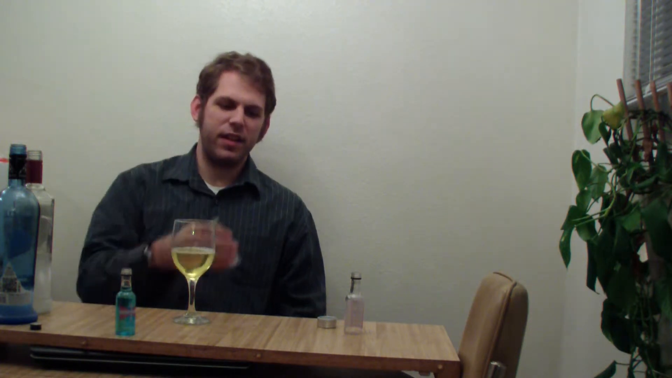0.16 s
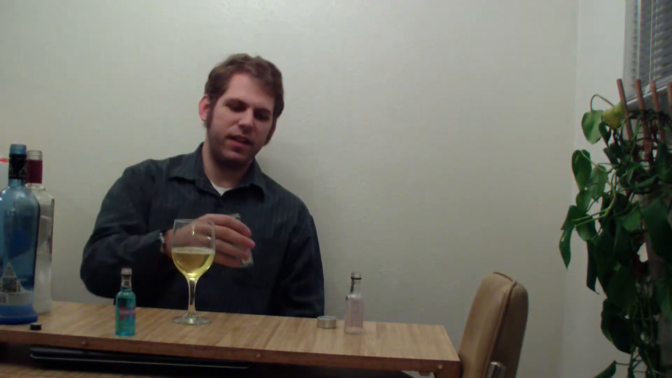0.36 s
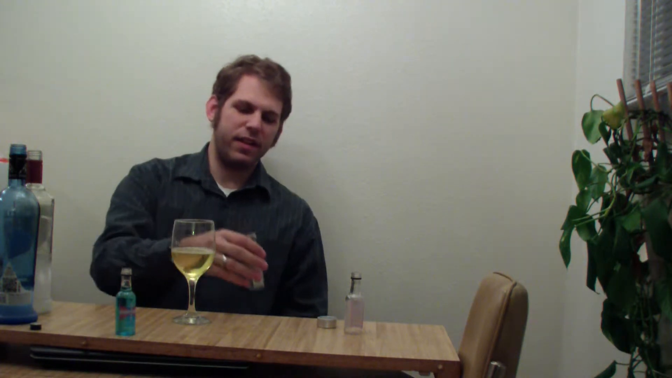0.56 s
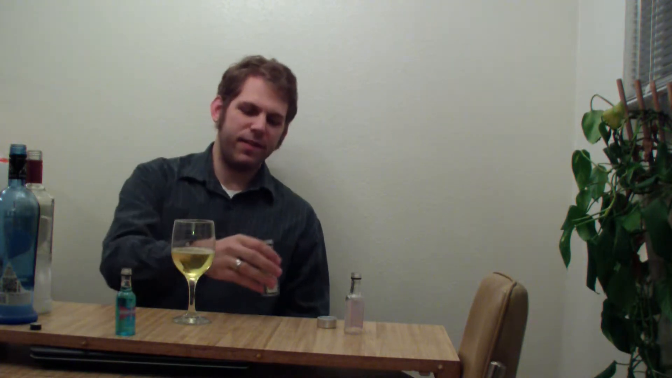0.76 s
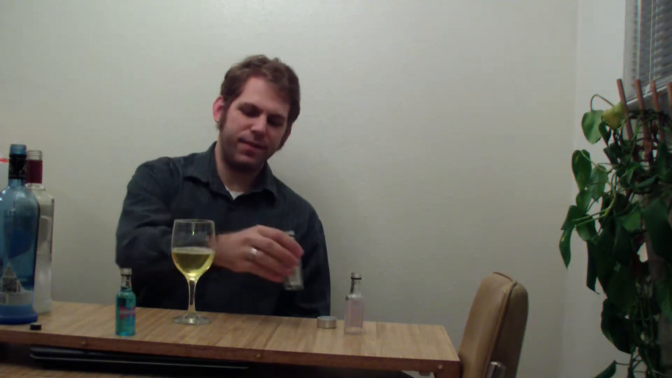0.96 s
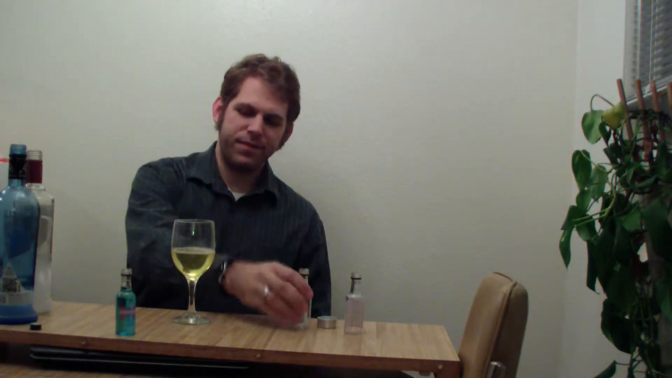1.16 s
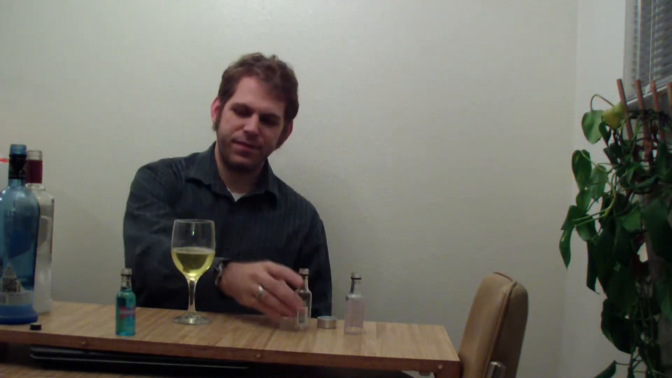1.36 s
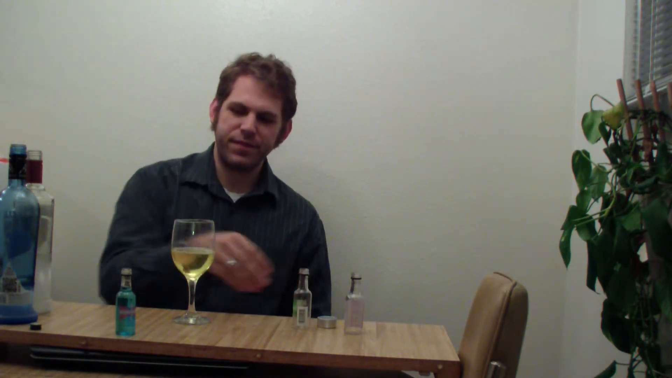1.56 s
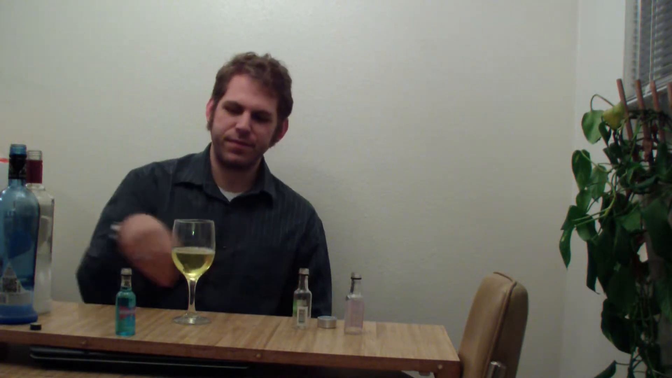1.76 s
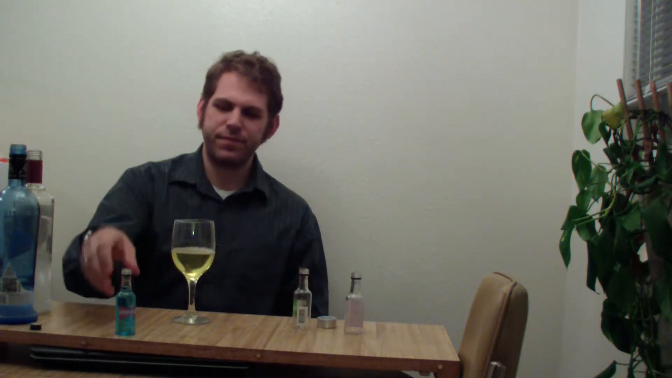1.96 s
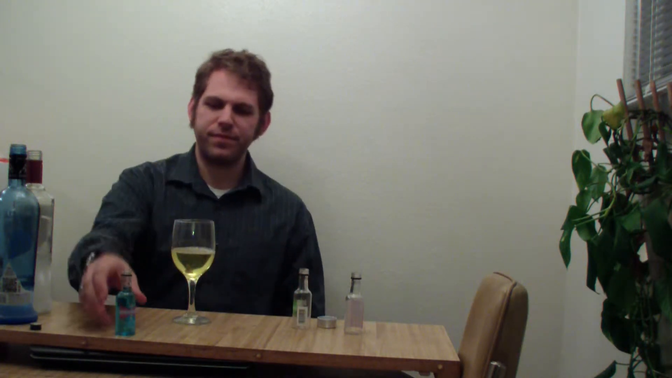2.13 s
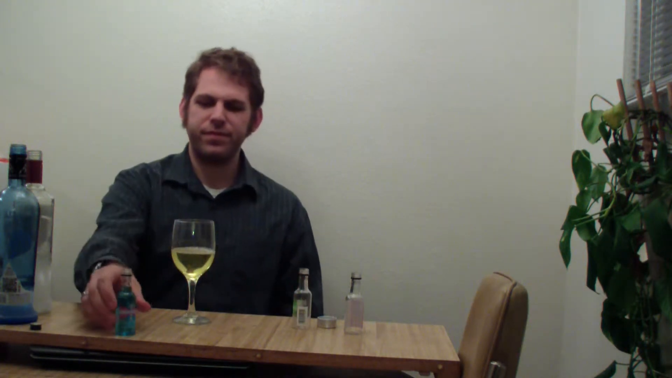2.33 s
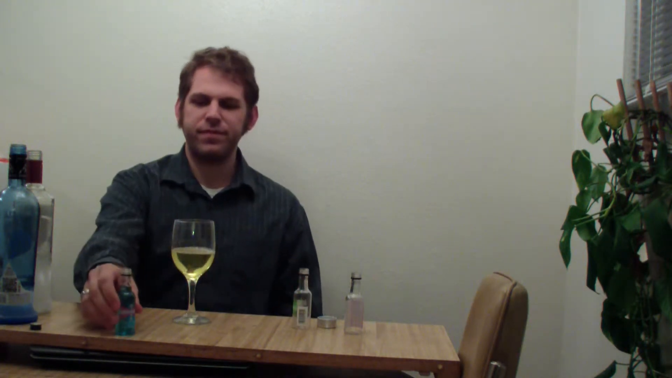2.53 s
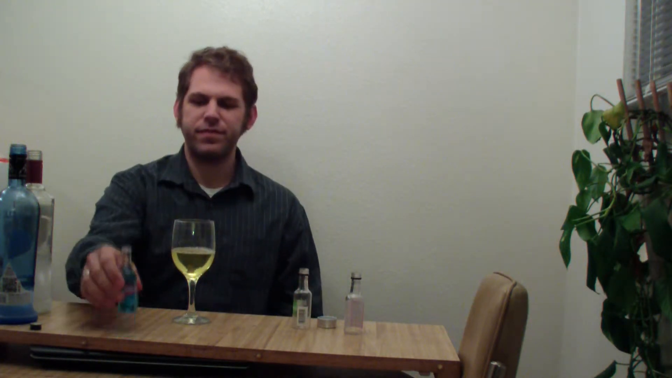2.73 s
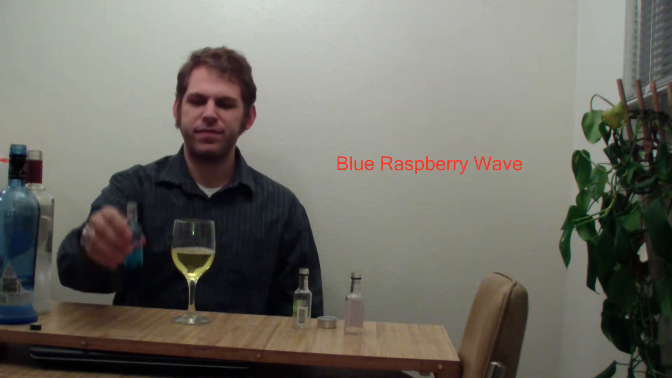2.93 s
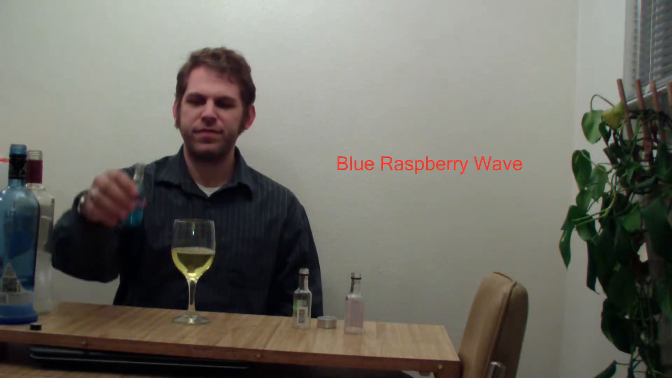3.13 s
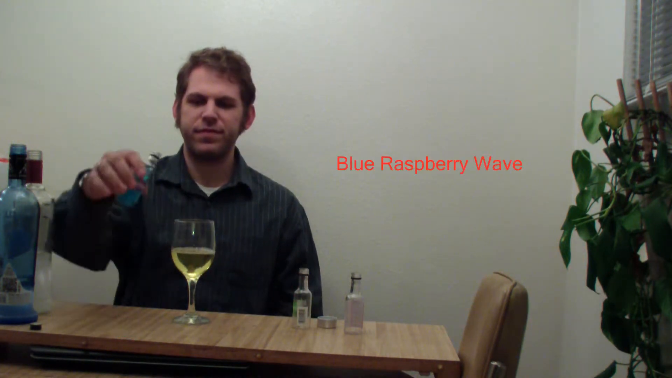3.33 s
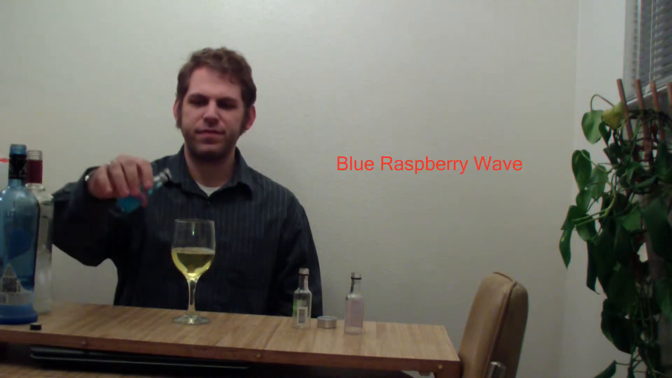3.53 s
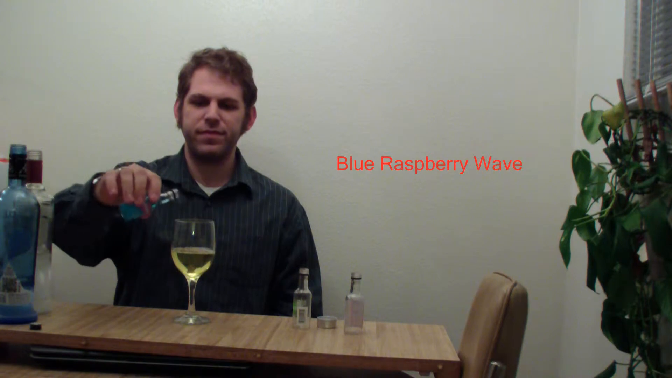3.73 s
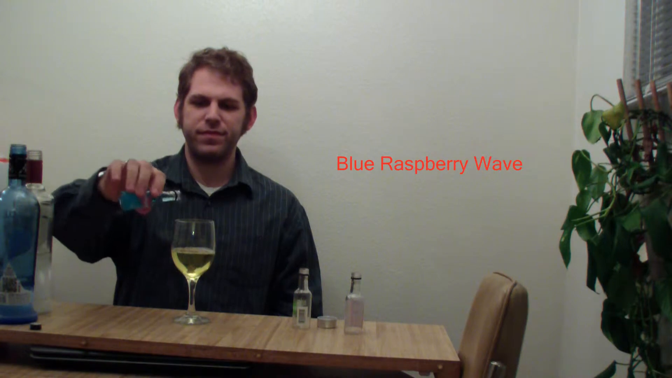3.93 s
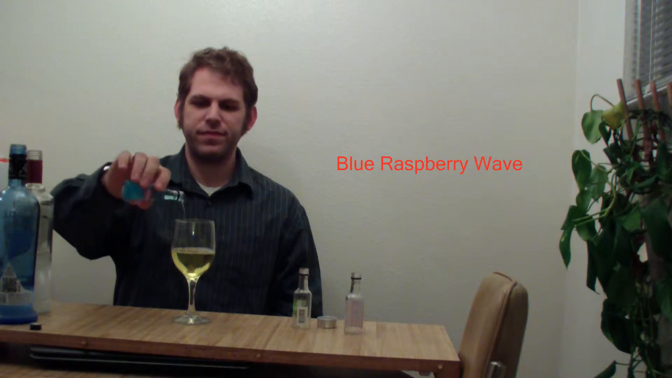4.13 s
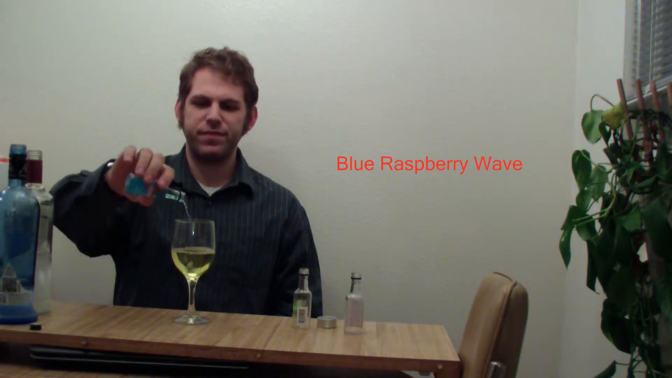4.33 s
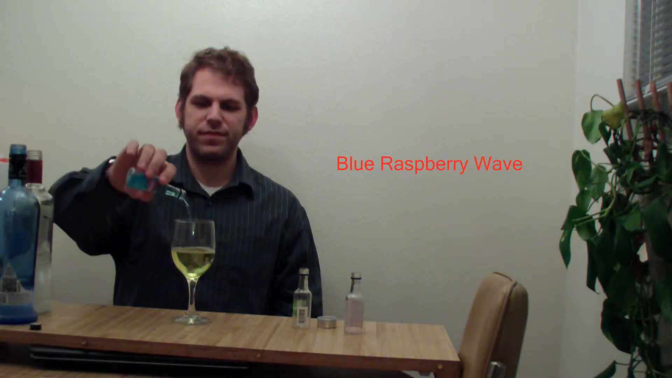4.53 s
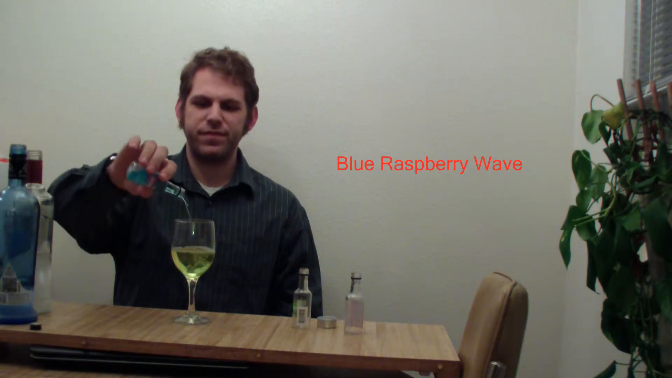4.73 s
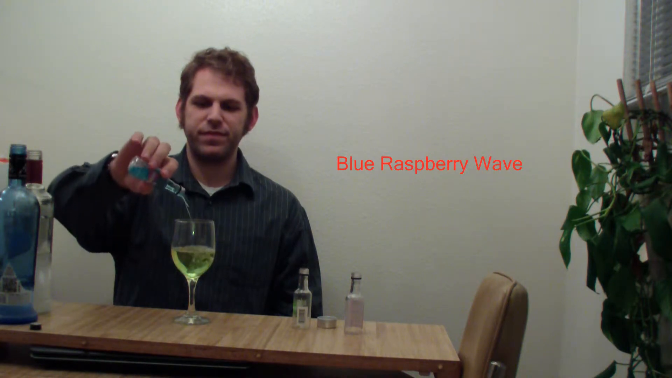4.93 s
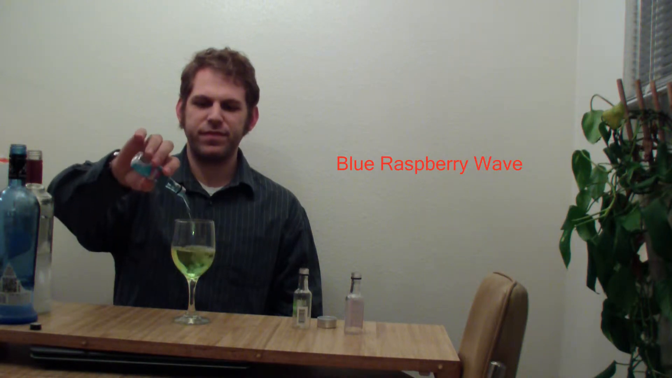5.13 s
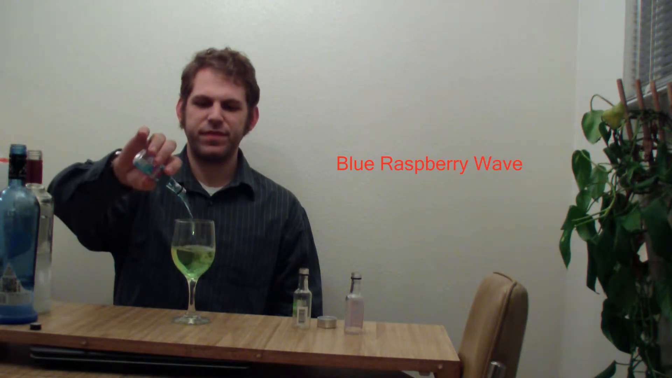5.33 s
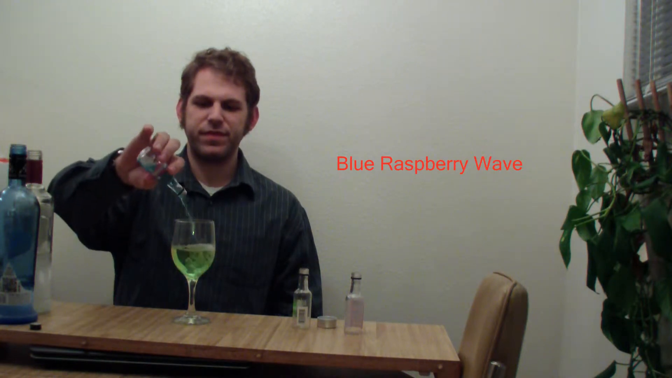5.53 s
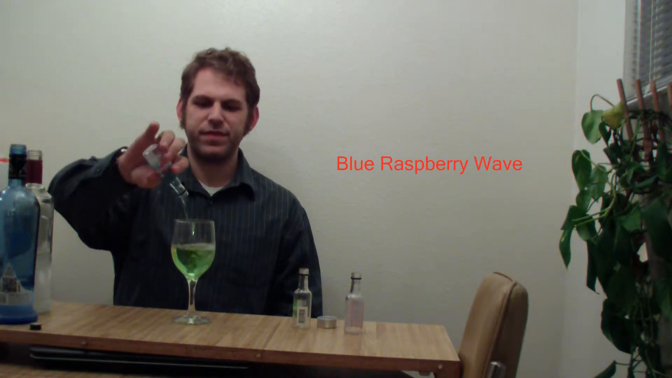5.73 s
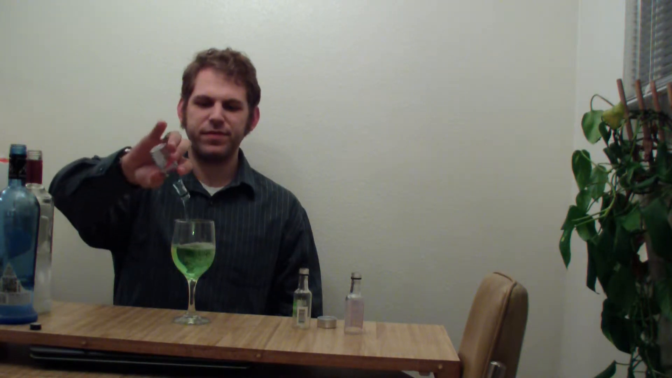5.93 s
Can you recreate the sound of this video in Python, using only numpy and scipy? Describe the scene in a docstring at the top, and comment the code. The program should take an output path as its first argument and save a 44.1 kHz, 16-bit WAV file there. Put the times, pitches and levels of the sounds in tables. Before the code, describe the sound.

In a small, quiet room, a few soft handling bumps lead to a miniature glass bottle being set down on a wooden table with a sharp knock. After a pause and another faint bump, a second bottle is poured into a half-full wine glass: a few drops first, then uneven little glugs over a thin, fizzy trickle. The microphone, a short way off, picks up slight room echo and faint hiss.

```python
"""Miniature bottles and a wine glass

In a small bare room a miniature glass bottle is set down hard, exciting the modes of a wooden table
and of its own glass. A second one is picked up and tipped over a half-full wine glass: first drops,
then uneven glugs as air gulps back through its neck, while the thin stream trickles and fizzes.
The pour sounds through trapped bubbles, each a damped oscillator. Air and mains hum lie beneath."""
import sys
import numpy as np
from scipy import signal
from scipy.fft import rfft, irfft
from scipy.io import wavfile

SR = 44100
rng = np.random.default_rng(int(sys.argv[2]) if len(sys.argv) > 2 else 0)


def materialize(psi):
    """Save the field psi as 16-bit PCM at rate SR to the path in sys.argv[1].

    A 1-D psi becomes a single channel; in a 2-D psi each row is a channel.
    """
    bounded = np.clip(np.atleast_2d(psi).T, -1, 1)
    quanta = np.round(bounded * 32767).astype(np.int16)
    wavfile.write(sys.argv[1], SR, quanta)


N = 263718
TIME = np.arange(N) / SR


# Modes of the table top. Each row: frequency in Hz, level in dB, 60 dB decay time in seconds.
WOOD_MODES = [(386, -21, 0.33), (453.6, -26, 0.18), (565.4, -19.5, 0.16), (641, -9, 0.036),
              (665, -11, 0.058), (706, -15.5, 0.063), (726, -19.5, 0.13), (875, -22, 0.075),
              (947, -25, 0.075), (988, -17.5, 0.055), (1109, -20.5, 0.1), (1591, -22.5, 0.086),
              (1682, -35, .08), (1825, -29.5, .1)]
# Modes of the bottle. Each row: frequency in Hz, level in dB, 60 dB decay time in seconds.
BOTTLE_MODES = [(2556, -21.5, 0.1), (2785, -8.5, 0.064), (2827, -14.5, 0.16), (2970, -15, 0.077),
                (3050, -16.5, .07), (3420, -16, .03)]
# Crack of glass on wood. Each row: frequency in Hz, relative spectral density in dB.
CRACK_SPECTRUM = [(40, -23), (110, -24), (200, -44), (310, -31), (400, -22.5), (680, -2), (1000, -10),
                  (1700, -5), (2150, -22), (2900, -5.5), (4500, -23.5), (5800, -11.5), (7500, -24.5),
                  (9800, -21.5), (15000, -37)]
# Contacts of the base. Each row: start in seconds, relative levels of table, bottle and crack in dB.
CONTACTS = [(1.3092, 1, -1, 5), (1.3140, 1, -0.5, 4), (1.3179, 5.5, -20, -5), (1.3257, 4, -14.5, -7.5),
            (1.3470, -11, -29.5, -10), (1.365, -15, -14, -13.5)]

def bottle_landing():
    """Impact excitation: as the base hits, rocks and settles, each contact rings wood and glass."""
    out = np.zeros(N)
    for start, table_db, bottle_db, crack_db in CONTACTS:
        add(out, start, from_db(table_db) * struck(WOOD_MODES, spread_db=2.0))
        add(out, start, from_db(bottle_db) * struck(BOTTLE_MODES, spread_db=2.5))
        add(out, start, from_db(crack_db - 8.0) * burst(CRACK_SPECTRUM, t60=0.03))
    return out


# Resonances that ring with each gulp. Each row: frequency in Hz, level in dB, 60 dB decay in seconds.
GULP_RESONANCES = [(374, 6.5, 0.072), (468.2, 3, 0.22), (581, 9.5, 0.076), (670, 0, 0.058), (773, 7.5, 0.064),
                   (958, 9, 0.027), (1110, 5.5, 0.06), (1260, -4, 0.059)]
# Gulps of air. Each row: start in seconds, relative bubble level in dB, bubble pitch in Hz, # relative level of
# the resonances in dB.
GULPS = [(4.373, -24.5, 926, -35.5), (4.652, -33, 1074, -69), (4.731, -34.5, 857, -41),
         (4.773, -38, 1000, -46), (4.904, -29.5, 924, -40), (4.942, -24, 1112, -35.5),
         (5.066, -31.5, 797, -56), (5.141, -27, 1238, -33.5), (5.289, -37, 700, -50),
         (5.361, -24.5, 664, -31), (5.459, -36, 1250, -53), (5.537, -24, 564, -30.5),
         (5.671, -28, 1102, -47), (5.728, -28.5, 695, -44), (5.783, -24.5, 1217, -37),
         (5.821, -26.5, 934, -37.5), (5.965, -30.5, 1120, -38)]

def glugs():
    """Bubble and resonance: each gulp rings as a bubble and sets a cluster of resonances ringing."""
    out, t = np.zeros(N), TIME[:SR // 2]
    for start, bubble_db, hz, resonance_db in GULPS:
        add(out, start, from_db(bubble_db - 2.0) * bubble(hz, t60=0.057, rise=0.074, swell_cycles=2.7))
        resonance = struck(GULP_RESONANCES, spread_db=2.5) * swell(t, 0.023)
        add(out, start, from_db(resonance_db - 8.5) * resonance)
    return out


def surges():
    """Relaxation of the flow: each glug releases a surge in proportion, quick to rise, slow to ebb."""
    out, t = np.zeros(N), TIME[:SR]
    for start, bubble_db, _, _ in GULPS:
        add(out, start, from_db(bubble_db) * swell(t, 0.018) * fade(t, t60=0.35))
    return out


# Spray around a drop. Each row: multiple of the drop's pitch, relative spectral density in dB.
SPRAY_SPECTRUM = [(.3, -9.5), (.7, -6.5), (1, -2), (1.35, -9), (2.6, -19.5)]
# The largest drops. Each row: start in seconds, relative level in dB, pitch in Hz, spray offset in dB.
DROP_IMPACTS = [(3.93, -34, 3120, -25), (4.1388, -36.5, 3800, -20), (4.3059, -30.5, 4150, -13.5),
                (4.4528, -36.5, 6950, -6), (4.648, -39, 3820, -13), (4.6894, -39.5, 7000, -10),
                (4.7232, -38.5, 4750, -1), (4.7743, -32, 6160, -8), (4.9035, -40, 5270, 3),
                (4.9284, -34.5, 4720, -6), (4.975, -37.5, 8530, -13), (5.111, -36, 4570, -3),
                (5.142, -37, 2870, -2.5), (5.2725, -32.5, 4540, -4), (5.2867, -36, 7240, 0),
                (5.3568, -27.5, 9070, -2), (5.584, -34, 2990, -24), (5.6343, -32.5, 4600, -4.5),
                (5.651, -38.5, 11500, 1.5), (5.7255, -36.5, 6940, 0.5), (5.7626, -31.5, 5080, -6.5)]

def drops():
    """Air entrainment: a drop traps a tiny ringing bubble, with a noisy spray around the same pitch."""
    out, t = np.zeros(N), TIME[:SR // 2]
    for start, db, hz, spray_db in DROP_IMPACTS:
        add(out, start, from_db(db + 0.5) * bubble(hz, t60=0.014, rise=0.06, swell_cycles=1.0))
        spray = [(hz * multiple, level_db) for multiple, level_db in SPRAY_SPECTRUM]
        add(out, start, from_db(db + spray_db) * burst(spray, t60=0.051) * swell(t, 0.011))
    return out


# Strength of the stream as the bottle tips. Each row: time in seconds, relative level in dB.
STREAM_FLOW = [(4.4, -68.5), (4.72, -56), (4.922, -57.5), (5.17, -55), (5.296, -56), (5.406, -50),
               (5.5, -57.5), (5.692, -47.5), (5.98, -54)]
# The stream's small bubbles. Each row: pitch in Hz, relative level in dB.
FIZZ_LEVELS = [(1600, -1), (2200, -10), (3000, 1.5), (5000, 3.5), (7000, 5.5), (9500, 5.5), (14000, 8)]

def trickle():
    """Continuous entrainment: stream and surges add in power, driving fine fizz over a soft burble."""
    flow = from_db(np.interp(TIME, *np.transpose(STREAM_FLOW)))
    surge, start = surges(), STREAM_FLOW[0][0]
    fizz = swarm(start, per_s=2000, low_hz=1540, high_hz=14400, cycles=51, spread_db=5.5,
                 colour=FIZZ_LEVELS)
    burble = swarm(start, per_s=140, low_hz=452, high_hz=1344, cycles=16, spread_db=1.0,
                   colour=[(450, -3), (850, -4), (1150, 1), (1320, 3.5)])
    fizz_gain = np.hypot(from_db(-1) * flow, from_db(-26.5) * surge)
    burble_gain = np.hypot(from_db(-1.5) * flow, from_db(-18.5) * surge)
    return fizz * fizz_gain + burble * burble_gain


def swarm(start, per_s, low_hz, high_hz, cycles, spread_db, colour):
    """Incoherent superposition: bubbles of random size and onset, at unit rms from the start time on."""
    out, duration = np.zeros(N), TIME[-1] - start
    for when, pitch, faintness in rng.random((int(per_s * duration), 3)):
        hz = low_hz * (high_hz / low_hz) ** pitch
        db = at_hz(colour, hz) - spread_db * np.log(faintness + 0.04)   # many faint, a few loud
        ring = bubble(hz, t60=cycles / hz, rise=0.069, swell_cycles=0.82)
        add(out, start + when * duration, from_db(db) * ring)
    return out / np.std(out[int(start * SR):])


# Modes of the wine glass. Each row: frequency in Hz, level in dB, 60 dB decay time in seconds.
BOWL_MODES = [(2440, -4, 0.14), (2994, -6.5, 0.17), (5780, -1, 0.11), (7160, -12, 0.11)]

def in_wine_glass(splash):
    """Sympathetic resonance: the bowl, driven by the splashing, rings faintly along with it."""
    ring = struck(BOWL_MODES, spread_db=0)
    return splash + from_db(-43) * signal.fftconvolve(splash, ring)[:N]


# Colour of a bump. Each row: multiple of the centre frequency, relative spectral density in dB.
BUMP_SPECTRUM = [(.2, -19.5), (.45, -1.5), (1, 4), (2, -6), (4, -11.5), (10, -22)]
# Bumps of hand, sleeve and bottle. Each row: start in seconds, relative level in dB, centre in Hz.
HANDLING_BUMPS = [(0.137, -32, 790), (0.273, -39.5, 3870), (0.447, -42.5, 692), (0.625, -33, 776),
                  (0.811, -37.5, 1000), (1.194, -35, 770), (2.814, -38.5, 1210)]

def handling():
    """Damped soft impacts: each touch gives a brief, dull band of noise."""
    out, t = np.zeros(N), TIME[:SR // 2]
    for start, db, hz in HANDLING_BUMPS:
        colour = [(hz * multiple, level_db) for multiple, level_db in BUMP_SPECTRUM]
        add(out, start, from_db(db - 7.5) * burst(colour, t60=0.081) * swell(t, 0.0035))
    return out


# The room's length, width and height. Each row: size, source position, microphone position in metres.
ROOM_AXES = [(4.13, .83, 2.71), (3.37, 1.49, 1.88), (2.46, .91, 1.33)]

def wall_echoes(size, order=50, port_gap_m=0.043, sound_m_per_s=343):
    """Image sources: each mirror image in the walls sends one echo to each of two microphone ports."""
    n = np.arange(-order, order + 1)
    offsets = [n * side + np.where(n % 2, side - source, source) - mic for side, source, mic in ROOM_AXES]
    x, y, z = np.ix_(*offsets)
    sign = 1 - 2 * (sum(np.ix_(n, n, n)) % 2)   # polarity flips at each reflection
    paths = [np.sqrt(x ** 2 + (y + port) ** 2 + z ** 2) for port in (0, port_gap_m)]
    direct_m, channels = paths[0].min(), []
    for path in paths:
        lag = ((path - direct_m).clip(0) * SR / sound_m_per_s).astype(int)
        channels.append(np.bincount(lag.ravel(), (sign / path).ravel(), size)[:size])
    return np.array(channels)


# Reverberation of the room. Each row: frequency in Hz, 60 dB decay time in seconds.
REVERB_TIMES = [(100, 0.15), (500, 0.35), (1500, 0.35), (3000, 0.46), (6000, 0.42), (12000, 0.31)]

def room_tail(bands=9):
    """Reverberation: wall echoes thicken into a tail of unit energy, each octave dying at its own rate."""
    t = TIME[:SR // 2]
    hz, centres = np.fft.rfftfreq(len(t), 1 / SR), np.geomspace(60, 15000, bands)
    onset = np.clip((t - .004) / .014, 0, 1)   # keeps the direct sound out of the tail
    echoes = rfft(wall_echoes(len(t)) * onset)
    tail = 0
    for centre, share in zip(centres, np.eye(bands)):
        band = irfft(echoes * at_hz(np.c_[centres, share], hz), len(t))
        tail += band * fade(t, at_hz(REVERB_TIMES, centre))
    return rms_one(tail) / np.sqrt(len(t))


# Reflections off the table and the wall behind it. Each row: delay in seconds, level in dB.
EARLY_ECHOES = [(.00175, -15.5), (.0043, -8.5), (.00635, -8), (.0088, -7.5)]

def in_room(sound, tail, wet_db, pan_db):
    """Convolution with the room's impulse response: direct sound, early echoes and diffuse tail."""
    response = from_db(wet_db) * tail
    response[:, 0] += 1
    for delay, db in EARLY_ECHOES:
        response[:, int(delay * SR)] += from_db(db)
    pan = from_db(np.array([[pan_db], [-pan_db]]) / 2)
    return pan * signal.fftconvolve(sound[None], response, axes=1)[:, :N]


# Still room air. Each row: frequency in Hz, relative spectral density in dB.
AIR_SPECTRUM = [(20, -2.5), (40, -5.5), (62, -3), (85, -4.5), (140, -1.5), (220, -8.5), (350, -10.5),
                (600, -15.5), (1300, -21), (2000, -22), (3800, -19.5), (6000, -23), (10000, -25.5),
                (15000, -26.5)]
# Likeness of the air noise in the two channels. Each row: frequency in Hz, correlation from 0 to 1.
AIR_COHERENCE = [(60, 0.78), (180, 0.84), (540, 0.63), (1640, 0.52), (4950, 0.44), (14900, 0.0083)]
# Mains harmonics. Each row: frequency in Hz, rms level in dB.
HUM_HARMONICS = [(60, -65), (120, -70.5), (180, -67.5)]

def background():
    """Ambient noise: room air, most coherent in the bass, with the harmonics of a faint mains hum."""
    air = stereo(coloured(AIR_SPECTRUM, N), coloured(AIR_SPECTRUM, N), AIR_COHERENCE)
    hum = sum(from_db(db) * np.sqrt(2) * np.sin(2 * np.pi * (hz * TIME + rng.random()))
              for hz, db in HUM_HARMONICS)
    return from_db(-47) * air + hum


def struck(modes, spread_db):
    """Modal superposition: one blow starts damped sines of alternating sign and randomised strength."""
    t = TIME[:SR // 2]
    out = np.zeros(len(t))
    for k, (hz, db, t60) in enumerate(modes):
        gain = (-1) ** k * from_db(db + spread_db * rng.standard_normal())
        out += gain * np.sin(2 * np.pi * hz * t) * fade(t, t60)
    return out


def bubble(hz, t60, rise, swell_cycles):
    """Volume pulsation: a bubble rings, its pitch climbing by the fraction rise as it nears the surface."""
    t = TIME[:int(max(t60, .002) * SR)]
    phase = 2 * np.pi * hz * (t + rise * t * t / (2 * t[-1]))
    return np.sin(phase) * fade(t, t60) * (1 - np.exp(-t * hz / swell_cycles))


def burst(spectrum, t60):
    """A transient: coloured noise under an exponential decay."""
    t = TIME[:SR // 2]
    return coloured(spectrum, len(t)) * fade(t, t60)


def coloured(spectrum, size):
    """Spectral shaping: white noise filtered to a given spectrum, at unit rms."""
    hz = np.fft.rfftfreq(size, 1 / SR)
    white = rfft(rng.standard_normal(size))
    return rms_one(irfft(white * from_db(at_hz(spectrum, hz)), size))


def stereo(one, other, coherence):
    """Partial coherence: sum and difference of two independent noises give a correlated pair."""
    alike = np.clip(at_hz(coherence, np.fft.rfftfreq(len(one), 1 / SR)), -1, 1)
    mid = rfft(one) * np.sqrt((1 + alike) / 2)
    side = rfft(other) * np.sqrt((1 - alike) / 2)
    return irfft([mid + side, mid - side], len(one))


def fade(t, t60):
    """Exponential decay by 60 dB in t60 seconds."""
    return np.exp(-np.log(1000) * t / np.maximum(t60, 1e-3))


def swell(t, rise_s):
    """Exponential approach from 0 to 1."""
    return 1 - fade(t, rise_s)


def from_db(db):
    """Decibels to amplitude ratio."""
    return 10 ** (np.asarray(db) / 20)


def rms_one(x):
    """Normalisation to unit rms."""
    return x / np.sqrt(np.mean(x ** 2) + 1e-20)


def at_hz(points, hz):
    """Interpolation on a logarithmic frequency axis."""
    points = np.array(points)
    return np.interp(np.log(np.maximum(hz, 1)), np.log(points[:, 0]), points[:, 1])


def add(track, start_s, sound):
    """Superposition of a sound on a track."""
    start = int(round(start_s * SR))
    track[start:start + len(sound)] += sound[:N - start]


def scene():
    """Linear superposition: knock, handling and pour share one room response, over the background."""
    tail = room_tail()
    knock = in_room(bottle_landing(), tail, wet_db=-5.0, pan_db=-1.5)
    glugs_and_bumps = in_room(glugs() + handling(), tail, wet_db=-1.5, pan_db=0.8)
    splashes = in_room(in_wine_glass(drops() + trickle()), tail, wet_db=-2.1, pan_db=-1.8)
    return knock + glugs_and_bumps + splashes + background()


def record(dry):
    """Saturation and band limiting: the knock clips softly, and a steep low-pass cuts the top treble."""
    clipped = dry / (1 + dry ** 8) ** (1 / 8)
    low_pass = signal.ellip(12, .1, 90, 15450, fs=SR, output="sos")
    return signal.sosfilt(low_pass, clipped)


dry = scene()
out = record(dry)
materialize(out)
```